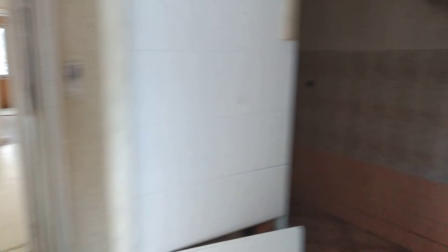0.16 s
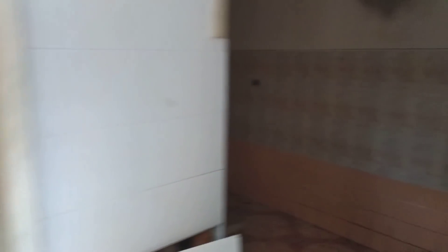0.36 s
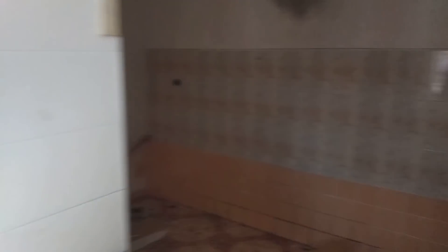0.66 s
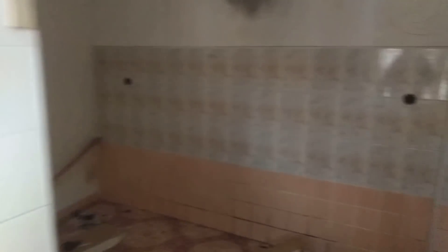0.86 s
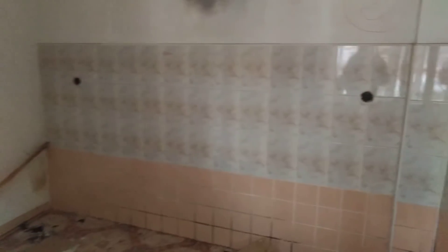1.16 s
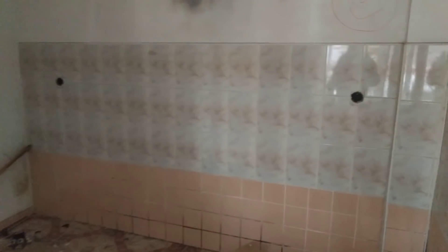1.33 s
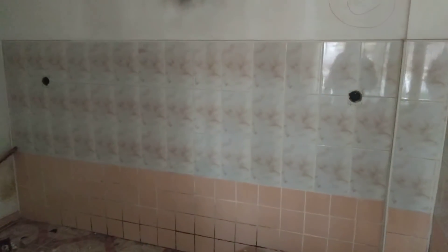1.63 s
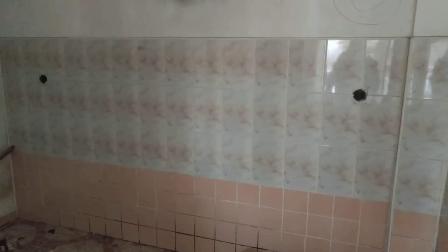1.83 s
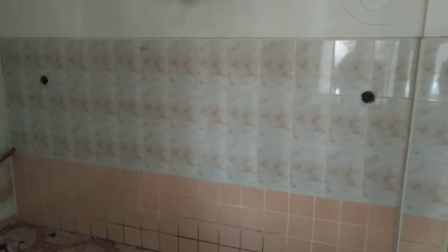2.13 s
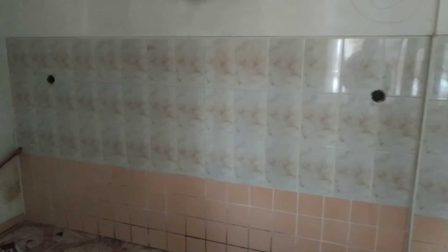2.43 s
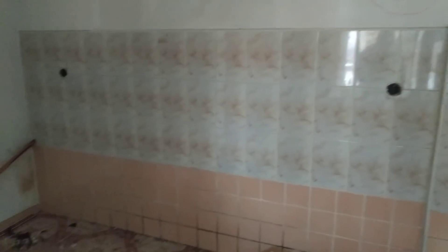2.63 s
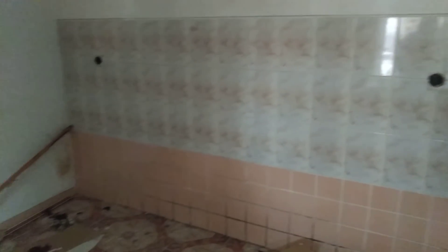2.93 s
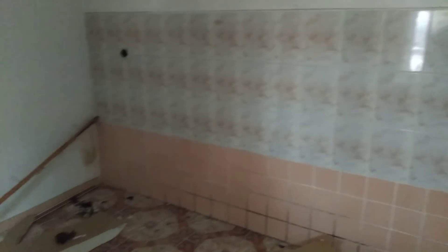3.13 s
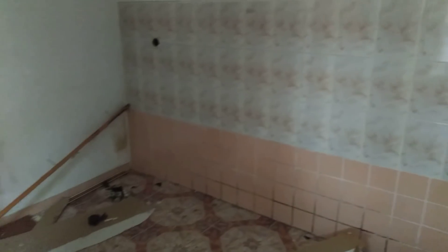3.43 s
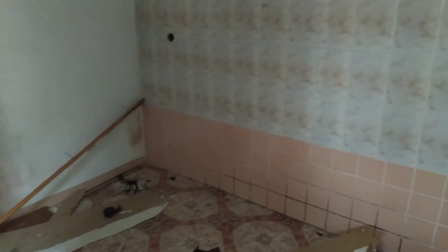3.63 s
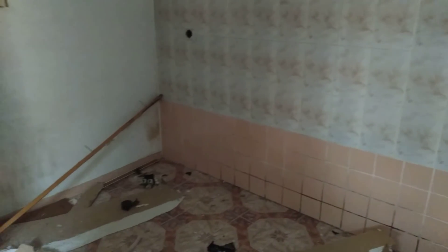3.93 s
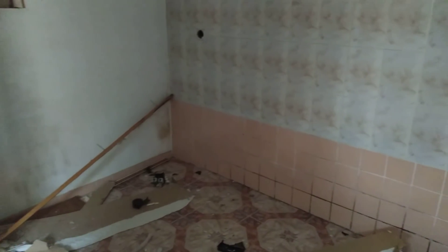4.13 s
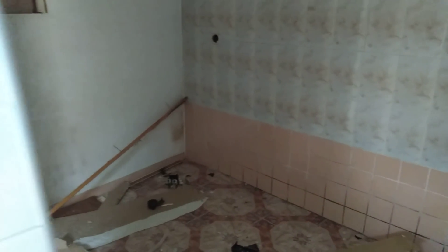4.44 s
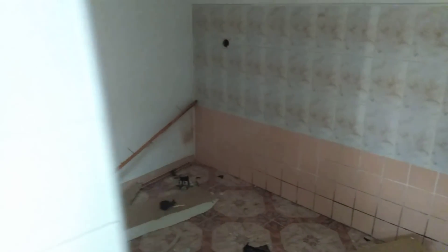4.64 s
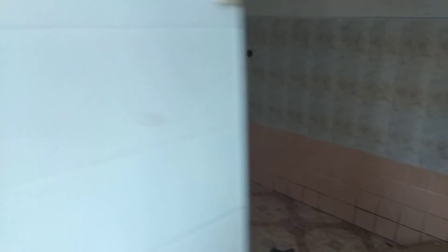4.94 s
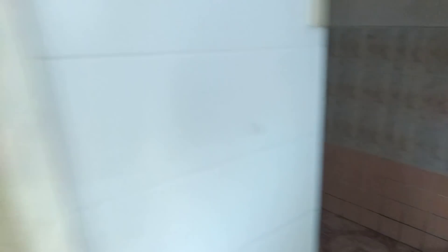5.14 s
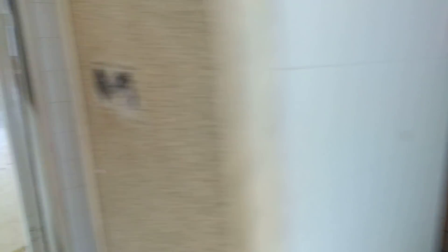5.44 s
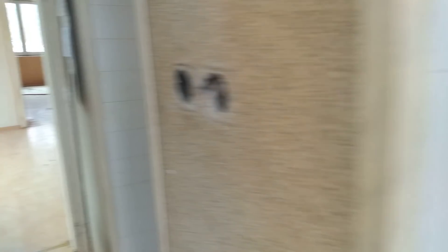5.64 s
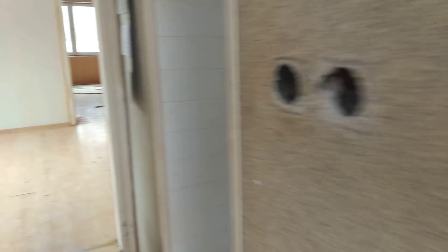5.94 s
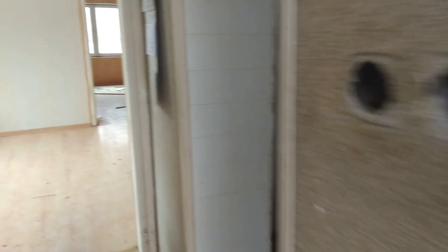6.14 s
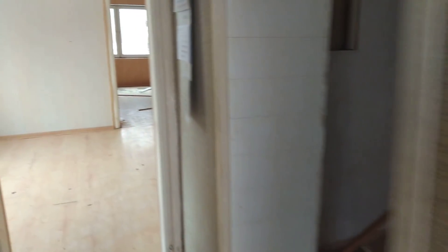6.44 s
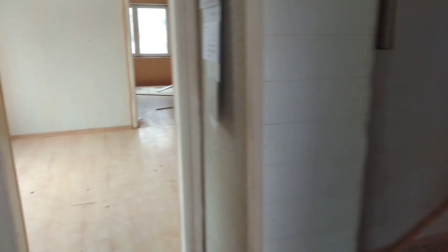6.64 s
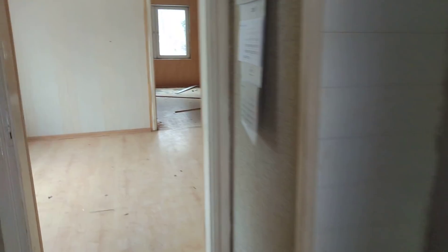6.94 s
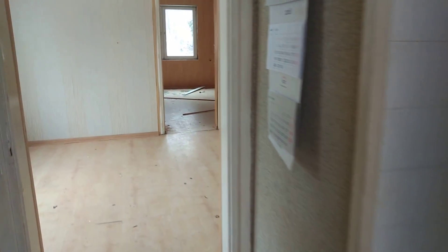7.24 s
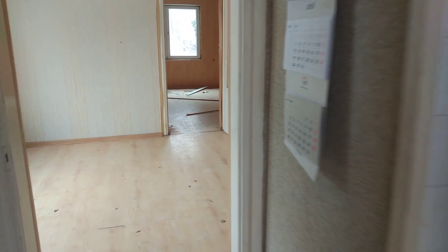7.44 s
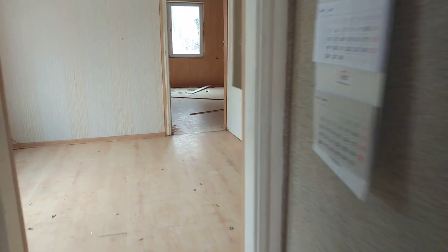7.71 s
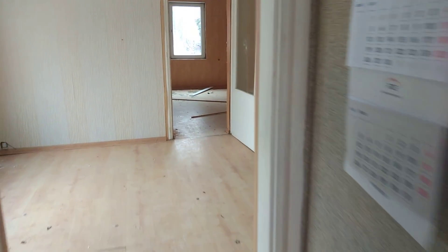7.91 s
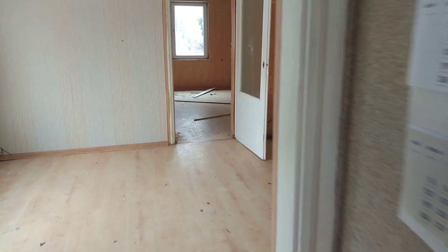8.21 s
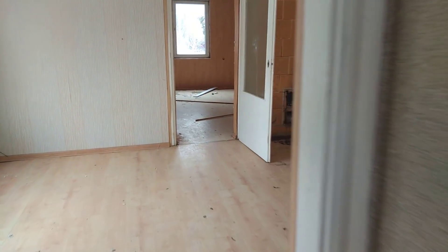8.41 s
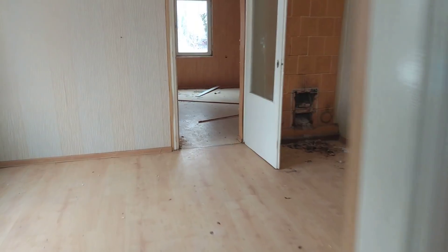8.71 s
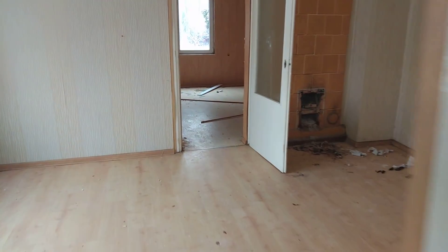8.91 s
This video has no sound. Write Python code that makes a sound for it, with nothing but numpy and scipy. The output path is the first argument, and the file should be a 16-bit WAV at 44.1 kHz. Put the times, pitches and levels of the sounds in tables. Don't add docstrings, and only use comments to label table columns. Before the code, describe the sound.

Footsteps on debris in a bare tiled room, heard near the microphone: faint crackles, then a heavy grinding crunch, a lull, and another brighter scuff with ringing shards. The walker moves onto laminate, with soft low thumps, small clicks and gritty scuffs. A faint boomy air tone continues, with thin bass and slightly patchy, gated recorder sound.

```python
import sys
import numpy as np
from scipy import signal
from scipy.io import wavfile
from scipy.ndimage import uniform_filter1d

SR = 44100
rng = np.random.default_rng(int(sys.argv[2]) if len(sys.argv) > 2 else 0)


def level_to_linear(level):
    exponent = np.asarray(level, float) / 20
    return 10 ** exponent


def wav_record(signal):
    frames = np.transpose(np.atleast_2d(signal))
    bounded = np.clip(frames, -1, 1)
    quanta = np.round(bounded * 32767).astype(np.int16)
    wavfile.write(sys.argv[1], SR, quanta)


N = 399987
TIME = np.arange(N) / SR


def rms_one(x):
    return x / np.sqrt(np.mean(x ** 2) + 1e-20)


def band(x, low_hz, high_hz, order=2):
    edges = [low_hz, min(high_hz, 0.45 * SR)]
    return signal.sosfilt(signal.butter(order, edges, "band", fs=SR, output="sos"), x)


def ring(x, hz, t60):
    r = level_to_linear(-60 / (t60 * SR))
    w = 2 * np.pi * hz / SR
    return signal.lfilter([0, np.sin(w)], [1, -2 * r * np.cos(w), r * r], x + 1e-18)


def add(out, s, sound):
    i = round(s * SR)
    out[i:i + len(sound)] += sound[:N - i]


def drift(rate_hz):
    r = np.exp(-80 * np.pi * rate_hz / SR)
    settle = 2000
    slow = signal.lfilter([1], [1, -2 * r, r * r], rng.standard_normal(N // 40 + settle + 2))[settle:]
    return np.interp(np.arange(N) / 40, np.arange(len(slow)), rms_one(slow))


def grit(size, per_s, spread_db):
    size_db = spread_db * np.minimum(rng.exponential(1, size), 4)
    fractures = level_to_linear(size_db) * rng.choice([-1, 1], size)
    return rms_one(fractures * (rng.random(size) < per_s / SR))


FINE_DB = [-32.5, -27, -13, -2]
COARSE_DB = [-4.5, -7, -10, -6.5]
MIXED_DB = [-10.5, 0.5, 0.5, -0.4]


def colour_db(coarseness):
    fine, coarse, mixed = np.c_[FINE_DB], np.c_[COARSE_DB], np.c_[MIXED_DB]
    return fine + coarseness * (coarse - fine) + 4 * coarseness * (1 - coarseness) * mixed


# time_s [s], scrape_db [dB], coarseness [0-1]
SHUFFLE = [(0.0, -35, 0.89), (0.25, -41.5, 0.85), (0.8, -58, 0.7), (1.5, -45, 0.6), (1.75, -26, 0.72),
           (2.25, -43, 0.88), (2.5, -48, 0.87), (2.9, -44.5, 0.72), (3.8, -44.5, 0.65),
           (4.047, -51.5, 0.87), (4.55, -35.5, 0.04), (5.15, -47, 0.98), (5.95, -46.5, 0.82),
           (6.5, -44, 0.91), (6.85, -42.5, 0), (7.3, -42, 0.87), (8.2, -40, 0.76), (9.07, -43.5, 0.89)]
# hardest_s [s], scrape_db [dB], rise_s [s], fall_s [s], coarseness [0-1]
STROKES = [(0.0, -39, .05, 0.39, .6), (0.45, -32.5, 0.059, 0.64, 0), (0.58, -32, 0.17, 0.26, 0.88),
           (1.09, -16.5, 0.054, 0.35, 0.1), (1.158, -26, 0.17, 0.15, 0.94), (1.291, -11, 0.13, 0.22, 0.74),
           (1.34, -12, 0.082, 0.099, 0.73), (1.39, -14.5, 0.33, 0.017, 0.3), (1.45, -25.5, 0.087, 1, 0.64),
           (1.84, -27, 0.5, 0.092, 0.65), (1.891, -20, 0.033, 0.2, 0.6), (3.13, -31.5, 0.37, 0.12, 0.3),
           (3.42, -30.5, 0.12, 0.52, 0.28), (3.62, -38.5, 0.23, 0.24, 0.65),
           (4.14, -24.5, 0.031, 0.22, 0.78), (4.33, -18.5, 0.055, 0.21, 0.53),
           (4.7, -32, 0.087, 0.56, 0.77), (4.9, -46, 0.48, 0.68, 1), (5.3, -33.5, 0.28, 0.54, 0.26),
           (5.49, -29.5, 0.18, 0.24, 0.6), (6.23, -35.5, 0.048, 0.77, 0.44), (7.12, -39, 0.86, 0.7, 0.86),
           (7.68, -30.5, 0.24, 0.48, 0), (7.88, -40, 0.087, 0.56, 0.93), (8.681, -35, 0.19, 0.56, 0.82)]
STROKE_FALL_DB = 20


def scrape_db():
    step = TIME[::64]
    s, db, coarseness = np.transpose(SHUFFLE)
    shuffle_db = np.interp(step, s, db) + colour_db(np.interp(step, s, coarseness))
    power = level_to_linear(2 * shuffle_db)
    for s, db, rise, fall, coarseness in STROKES:
        away = np.where(step < s, (s - step) / max(rise, 0.01), (step - s) / max(fall, 0.01))
        power = power + level_to_linear(2 * (db - STROKE_FALL_DB * away + colour_db(coarseness)))
    return np.array([np.interp(TIME, step, 10 * np.log10(p)) for p in power])


DRAG_EDGES_HZ = [250, 900, 3000, 7000, 17000]


def drag():
    together = drift(5.1)
    noises = 0.82 * grit(N, per_s=1500.0, spread_db=8.5) + rng.standard_normal((2, N))
    edges = np.geomspace(250, 17000, 13)
    width = np.diff(DRAG_EDGES_HZ)
    per_hz_db = scrape_db() - 10 * np.log10(width)[:, None]
    centres = np.log(DRAG_EDGES_HZ[:-1] + 0.4 * width)
    out = 0
    for k, (low_hz, high_hz) in enumerate(zip(edges, edges[1:])):
        place = np.interp(np.log(low_hz * high_hz) / 2, centres, range(4))
        below = min(int(place), 2)
        db = per_hz_db[below] + (place - below) * (per_hz_db[below + 1] - per_hz_db[below])
        flicker_db = 0.74 * drift(14.0)
        out = out + level_to_linear(db + flicker_db) * band(noises[k % 2], low_hz, high_hz)
    return out * level_to_linear(0.41 * together + 10 * np.log10(SR / 2) - 1.0)


# start_s [s], peak_db [dB], brightest_hz [Hz], t60_s [s]
GRIT_CRACKS = [(0.068, -16.5, 11900, 0.41), (0.39, -28, 13300, 0.85), (2.173, -18, 11500, 0.44),
               (2.416, -29.5, 14050, 0.83), (2.561, -30, 13500, 0.95), (2.888, -24, 13000, 0.25),
               (3.009, -33, 7300, 0.7), (3.6062, -18.5, 10300, 0.5), (3.668, -21.5, 11500, 0.3),
               (3.784, -31, 13100, 1), (3.9712, -25, 12900, 1), (4.08, -26, 9000, 0.56),
               (4.274, -17, 12000, 0.5), (4.281, -17, 6500, 1), (4.5014, -19.5, 7040, 0.65),
               (4.317, -12, 11500, 0.63), (6.848, -28, 10800, 0.2)]
# start_s [s], peak_db [dB], plaster_db [dB re peak], brightest_hz [Hz], t60_s [s]
PLASTER_CRACKS = [(0.0467, -17, -19, 13200, 0.21), (1.112, -10.5, -15, 3400, 0.65),
                  (1.2236, -10, -22, 10400, 0.15), (2.755, -22.5, -14, 10800, 0.36),
                  (3.2676, -16, -11.5, 9700, 0.61), (3.2987, -17, -26, 4800, 0.43),
                  (3.5807, -21.5, -9, 11800, 0.87), (4.676, -24.5, -7, 6860, 1),
                  (5.2624, -29, -6, 3320, 0.37), (5.497, -17, -27, 3540, 0.48),
                  (6.103, -29, -11, 12700, 0.45), (6.419, -30, -14, 6640, 0.21),
                  (6.432, -24.5, -13, 11800, 0.49), (6.799, -28.5, -24, 5860, 0.25),
                  (7.3, -24.5, -16, 10800, 0.7), (8.8014, -24.5, -9.5, 12500, 0.9)]
# start_s [s], peak_db [dB], board_db [dB re peak], plaster_db [dB re peak], t60_s [s]
HEAVY_CRACKS = [(0.447, -32, 4.5, -29, 0.29), (0.5056, -26, 3.5, -4, 1), (0.5534, -20, 6, -17, 0.05),
                (0.5712, -28.5, 12, -27, 0.5), (0.6733, -37, 11, 10.5, 1), (0.982, -15, -13.5, -40, 0.97),
                (1.268, -4, -1, 0, 0.37), (1.3429, -1.5, -32, -4.5, 0.56), (1.68, -7, -0.5, -9.5, 0.85),
                (1.7904, -9, -6.5, -7, 0.58), (1.9008, -9, -8.5, -3.5, 0.89), (3.127, -30, 1.5, 6.5, 0.78),
                (4.124, -13, -8.5, -11, 0.21), (4.868, -25, -17, -27, 0.22), (5.104, -25.5, 1.5, 0.5, 0.76),
                (5.3333, -20.5, -5.5, -16, 0.97), (5.6006, -19.5, -2, -4, 0.37), (6.244, -28.5, 4, 1, 0.87),
                (6.9588, -25, -7.5, -8, 0.89), (7.027, -24.5, 3.5, -4, 0.13), (7.8994, -31.5, 3, -1, 0.52)]


def crack_list():
    rows = []
    for s, db, hz, t60 in GRIT_CRACKS:
        rows.append((s, db, -50, -45, hz, t60))
    for s, db, plaster_db, hz, t60 in PLASTER_CRACKS:
        rows.append((s, db, -23.5, plaster_db, hz, t60))
    for s, db, board_db, plaster_db, t60 in HEAVY_CRACKS:
        hz = np.clip(10400 - 96 * (plaster_db - 5.5), 3000, 13000)
        rows.append((s, db, board_db, plaster_db, hz, t60))
    return sorted(rows)


def cracks():
    out, t = np.zeros(N), np.arange(SR // 3) / SR
    for s, db, board_db, plaster_db, hz, t60 in crack_list():
        noise = 0.21 * grit(len(t), per_s=2800.0, spread_db=-6.5) + rng.standard_normal(len(t))
        piece = ring(noise, hz, 14.0 / hz)
        bright = rms_one(band(noise, 0.22 * hz, 13600)) + 0.55 * rms_one(piece)
        plaster = level_to_linear(plaster_db + 0.5) * rms_one(band(noise[::-1], 820, 3300))
        board = level_to_linear(board_db - 4.0) * rms_one(band(noise, 250, 1540))
        onset = 1 - np.exp(-t / 0.0018)
        direct = 1 + 0.8 * np.exp(-t / 0.004)
        decay = level_to_linear(-60 * t / max(t60, 0.02)) * (1 - (t / t[-1]) ** 4)
        add(out, s, level_to_linear(db - 14.0) * onset * direct * decay * (rms_one(bright) + plaster + board))
    return out


# start_s [s], peak_db [dB], pitch_hz [Hz]
SNAPS = [(0.0457, -18, 1400), (0.07, -12, 7500), (0.0753, -16, 12900), (0.0918, -19, 7800),
         (0.1136, -19, 8100), (0.1236, -18, 8200), (0.3929, -28, 12600), (0.4038, -26, 9800),
         (0.4381, -28, 11700), (0.5058, -12, 11000), (0.5236, -17, 10600), (0.543, -18, 8700),
         (0.5464, -18, 10900), (0.5513, -16, 10400), (0.5548, -12, 10600), (0.5724, -18, 11500),
         (0.6346, -25, 11200), (0.6747, -22, 1600), (0.709, -23, 12200), (0.7637, -28, 12900),
         (0.9812, -20, 7600), (1.226, -7, 10400), (1.3419, -3, 2300), (1.454, -9, 13100),
         (1.6826, -13, 11600), (1.7751, -12, 12700), (1.782, -17, 4000), (1.7934, -11, 7900),
         (2.1754, -20, 10900), (2.1793, -19, 7300), (2.4196, -28, 13500), (2.5633, -32, 11600),
         (2.7605, -26, 9600), (2.8909, -24, 13200),
         (3.0097, -24, 9600), (3.0123, -21, 9900), (3.1347, -23, 11400), (3.2708, -17, 11600),
              (3.2733, -16, 12000), (3.3994, -23, 11900), (3.5822, -18, 11700), (3.5848, -21, 11600),
              (3.6067, -17, 9800), (3.7871, -28, 10900), (3.9726, -25, 12300), (3.9754, -26, 11100),
              (4.0811, -27, 7700), (4.1256, -17, 2200), (4.2732, -18, 13100), (4.289, -14, 6300),
              (4.32, -11, 11200), (4.3253, -9, 11800), (4.5038, -22, 6100), (4.5061, -17, 6900),
              (4.8675, -28, 13100), (4.878, -23, 11600), (4.9734, -29, 12500), (5.1066, -21, 1200),
              (5.2285, -30, 13400), (5.267, -23, 1300), (5.315, -26, 12500), (5.3334, -20, 1200),
              (5.4992, -19, 10700), (5.871, -11, 11500), (6.2097, -29, 11500), (6.2438, -24, 13200),
              (6.2475, -20, 13400), (6.2516, -21, 12100), (6.4194, -29, 6600), (6.432, -22, 13500),
              (6.8029, -30, 6000), (6.8089, -28, 5800), (6.8526, -27, 10600), (7.0293, -25, 10600),
              (7.3049, -21, 11100), (7.3248, -23, 10200), (7.3675, -26, 13300), (7.45, -27, 11000),
              (7.462, -28, 10100), (7.4763, -28, 10300), (7.4872, -25, 10800), (7.5447, -22, 9600),
              (7.549, -25, 12600), (7.557, -26, 13100), (7.5715, -29, 12500), (7.6374, -26, 9800),
              (7.8968, -22, 3700), (8.1938, -27, 11900), (8.8038, -23, 13400), (8.8871, -20, 11700),
              (8.8911, -19, 11000), (8.8945, -14, 13300)]


def snaps():
    out, t = np.zeros(N), np.arange(120) / SR
    for s, db, hz in SNAPS:
        noise = band(rng.standard_normal(len(t)), hz / 1.3, min(hz * 1.3, 14000))
        burst = noise * np.exp(-t / (0.0003 + 1.5 / hz))
        trim_db = np.interp(hz, [1500, 9000], [-3.5, 0.5])
        add(out, s, level_to_linear(db + trim_db) * burst / np.max(np.abs(burst)))
    return out


# start_s [s], peak_db [dB], pitch_hz [Hz], t60_s [s]
KNOCKS = [(1.2690, -10.5, 1110, 0.017), (1.341, -8, 1220, 0.017), (1.3500, -13, 1910, .015),
          (1.3608, -17, 1300, .015), (1.395, -16, 1520, .015), (1.6800, -12.5, 970, .008),
          (1.7910, -18.5, 950, 0.022), (1.9010, -25, 1280, 0.018), (1.9260, -18, 1200, 0.022),
          (4.1250, -26, 1880, .02), (4.143, -24, 2070, .02)]


def knocks():
    out, click = np.zeros(N), np.eye(1, SR // 10)[0]
    for s, db, hz, t60 in KNOCKS:
        t60 = max(t60, 0.003)
        add(out, s, level_to_linear(db) * (ring(click, hz, t60) + 0.5 * ring(click, 2.13 * hz, 0.71 * t60)))
    return out


def steadied(x, share):
    return x / (uniform_filter1d(x ** 2, SR // 80) + 0.05) ** (share / 2)


# start_s [s], level_db [dB], rise_s [s], t60_s [s], piece [name]
KICKS = [(0.045, -36, 0.00086, 0.73, "lump"), (0.068, -27.5, 0.0014, 0.46, "flake"),
         (0.981, -30, 0.001, 0.37, "corner"), (0.994, -29, 0.00086, 0.83, "shim"),
         (0.986, -20, 0.08, 1, "heap"), (1.074, -24, 0.016, 0.77, "sliver"),
         (1.10, -22, 0.08, 0.4, "strip"), (1.223, -20, 0.012, 0.31, "splinter"),
         (1.34, -27, 0.00054, 0.61, "slab"), (1.68, -40, 0.0014, 0.27, "plank"),
         (1.68, -25, 0.00061, 0.22, "board"), (2.371, -60.5, 0.055, 0.63, "panel"),
         (2.761, -44.5, 0.0022, 0.49, "pebble"), (2.886, -50, 0.0017, 1, "pebble"),
         (3.006, -18, 0.001, 0.82, "crust"), (4.078, -37, 0.0018, 0.27, "crumb"),
         (4.094, -41, 0.0018, 0.41, "clod"), (4.126, -22, 0.0011, 0.89, "brick"),
         (5.265, -41.5, 0.32, 1, "rubble"), (5.601, -30, 0.0019, 0.55, "tile"),
         (5.870, -12, 0.0008, 0.028, "tick"), (5.871, -27, 0.0032, 0.39, "glass"),
         (7.62, -38.5, 0.13, 0.78, "sand"), (8.422, -12.5, 0.036, 0.12, "burst"),
         (8.429, -19.5, 0.0099, 0.59, "spray"), (8.886, -33, 0.004, 0.071, "speck"),
         (8.893, -49, 0.001, 0.42, "speck")]
# start_s [s], level_db [dB], rise_s [s], t60_s [s],
# piece [name]
SLIDES = [(1.791, -29, .002, 0.68, "tread"), (1.901, -32, .02, 0.78, "tread"),
          (4.502, -34.5, .003, 0.32, "husk"), (6.232, -34, 0.013, 0.45, "dust"),
          (4.28, -36, .004, 0.44, "husk"), (8, -38, .01, 0.42, "dust"), (4.35, -36, 0.027, 0.76, "tread"),
          (1.245, -29, .002, .3, "tread"), (0.45, -34, .04, 0.65, "dust"), (4.3, -30, .03, 0.62, "grain"),
          (7.291, -44, .004, .4, "gravel"), (7.335, -38, 0.009, 0.45, "gravel"),
          (7.41, -38, .02, 0.9, "gravel"), (6.9, -45, .01, 0.52, "gravel"), (7.6, -37, .03, 1, "gravel"),
          (5.5, -38, .003, .3, "gravel")]
# mode_hz [Hz], level_db [dB], width_hz [Hz]
HARD_PIECES = dict(flake=[(7700, -3.5, 620), (8450, -6, 650), (11500, -5.5, 230), (13000, -2, 400)],
               corner=[(7820, 5.5, 180), (12000, 0, 120)], shim=[(9430, 3, 62), (12800, 0, 64)],
               sliver=[(10140, 2.5, 93), (10440, -2, 53), (10800, -4, 50), (12400, 2, 100), (13300, -9, 80),
               (13800, 1, 100)], strip=[(6385, 8, 45)], splinter=[(10400, 5.5, 490), (7800, -11, 304)],
               slab=[(1247, 4, 106), (952, -10, 63), (1072, -5, 33), (1760, 1, 53), (1980, 3.5, 69),
               (2166, 4.5, 55), (2316, 5, 150), (3160, -2.5, 220), (1600, 4.5, 1500)],
               plank=[(11800, 3, 170), (13600, 0, 150)], board=[(373, 4, 200), (203, -2, 44),
               (880, -2, 110), (600, -6, 98)], panel=[(453, 14.5, 28)], tile=[(4020, 1.5, 80),
               (4230, -5, 250), (5015, -2, 90), (10400, -5, 50), (10900, -7.5, 72)],
               glass=[(8960, -2.5, 71), (11900, 1.5, 280), (11500, -10, 1600)])
# mode_hz [Hz], level_db [dB], width_hz [Hz]
SOFT_PIECES = dict(lump=[(1490, -3, 680)], heap=[(8400, 4, 11400)], pebble=[(3000, -0.5, 720),
               (6360, -3, 1500)], crust=[(7360, -17.5, 2200), (5240, -22, 1100)], crumb=[(7800, -1, 1000)],
               clod=[(1140, -2, 1100)], brick=[(1915, -9, 440), (1840, -10.5, 940)],
               rubble=[(3420, 19, 1040), (1260, 1, 220)], tick=[(11900, -11, 1500), (6100, -24, 2100),
               (9100, -7, 100)], sand=[(1150, 5.5, 1130), (3550, 8, 3500)], burst=[(11900, 14, 5400),
               (7650, 1.5, 8400), (3320, -2.5, 2500), (1220, -14, 420)], spray=[(10900, -3.5, 4600),
               (4970, -9, 4900)], speck=[(11500, 13.5, 4500)], tread=[(1200, -0.5, 460), (4570, -8, 980)],
               husk=[(6100, -3, 1200), (10000, 2, 4300)], gravel=[(10000, -0.5, 1500), (13000, -4, 1500)],
               grain=[(3900, 3, 1800)], dust=[(13000, 3.5, 2000), (11100, -5, 2600)])


def shards(events):
    out, t = np.zeros(N), np.arange(SR // 2) / SR
    settle = 2000
    for s, db, rise, t60, piece in events:
        modes = {**HARD_PIECES, **SOFT_PIECES}[piece]
        share = 0.35 if piece in HARD_PIECES else 0
        tone = np.zeros(len(t))
        for hz, mode_db, width in modes:
            skid = rng.standard_normal(len(t) + settle)
            mode = rms_one(band(skid, hz - width / 2, hz + width / 2)[settle:])
            tone += level_to_linear(mode_db) * steadied(mode, share)
        add(out, s, level_to_linear(db - 60 * t / t60) * (1 - np.exp(-t / max(rise, 1e-4))) * tone)
    return out


def chips():
    hits = grit(N, per_s=88.0, spread_db=5.5)
    dealt = rng.integers(0, 12, N)
    pitches = np.geomspace(5500, 13500, 12) * rng.uniform(0.96, 1.04, 12)
    rings = sum(ring(hits * (dealt == k), hz, 0.025) for k, hz in enumerate(pitches))
    drag_db = scrape_db()[3]
    level_db = drag_db - 9 + 0.6 * np.minimum(drag_db + 25, 0)
    return level_to_linear(level_db) * rms_one(0.5 * rings + room(rings))


# start_s [s], peak_db [dB], pitch_hz [Hz]
HEELS = [(0.574, -40, 135), (1.264, -30, 270), (1.68, -25, 276), (4.875, -42, 120), (5.098, -37.5, 362),
         (6.207, -33, 174), (6.236, -34.5, 127), (6.512, -38.5, 68), (6.959, -34, 163), (6.98, -37, 97),
         (7.019, -47, 202), (7.132, -45, 80), (7.298, -41, 92), (7.827, -41.5, 185), (7.835, -37, 88),
         (7.907, -46, 90), (7.964, -38, 68), (8.01, -43, 75), (8.112, -36, 68), (8.625, -30.5, 174),
         (8.72, -41, 75)]
HEEL_T60_S = 0.12


def heels():
    out, t, t60 = np.zeros(N), np.arange(SR // 2) / SR, HEEL_T60_S
    push_s = 0.0009
    push = np.exp(-t / push_s) / (push_s * SR)
    for s, db, hz in HEELS:
        puff = rms_one(band(rng.standard_normal(len(t)), 0.55 * hz, 1.96 * hz)) * level_to_linear(-60 * t / (1.84 * t60))
        thump = ring(push, hz, 0.46 * t60)
        thump += 0.35 * ring(push, 2.0 * hz, 0.097 * t60)
        thump += 0.58 * ring(push, max(0.56 * hz, 64), 1.0 * t60)
        add(out, s, level_to_linear(db + 2.5) * (thump + 0.2 * puff))
    return out


ROOM_T60_S, ROOM_DB = 0.44, 2.5


def room(x):
    t = np.arange(SR // 2) / SR
    tail = rng.standard_normal(len(t)) * level_to_linear(-60 * t / ROOM_T60_S) * (t > 0.004)
    return signal.fftconvolve(x, tail / np.sqrt(np.sum(tail ** 2)))[:N]


# mode_hz [Hz], level_db [dB], t60_s [s]
STANDING = [
    (362.3, -75, 0.32),
    (272, -75.5, 0.27),
    (224, -72, 0.12),
]


def standing_waves(x):
    return sum(level_to_linear(db + 18) * ring(x, hz, t60) for hz, db, t60 in STANDING)


# time_s [s], level_db [dB]
BOOM = [(0.0, -32.5), (0.1, -34.5), (0.3, -40), (0.45, -48.5), (0.73, -34.5), (0.91, -39), (1.15, -53.5),
        (1.51, -47), (1.95, -56.5), (3.21, -49), (4.27, -54.5), (4.6, -51), (5.56, -46), (6.0, -47),
        (6.15, -54), (7.63, -58), (8.3, -44.5), (8.97, -41)]
BOOM_HZ, BOOM_WIDTH_HZ = 59, 6
BOOM_PER_HEEL_DB, BOOM_AFTER_HEEL_S = -24, 0.044
INSIDE_S, DOORWAY_S = 2.54, 5


def boom():
    s, db = np.transpose(BOOM)
    boom_db = np.interp(TIME, s, db)
    stirred = 0
    for s, db, hz in HEELS:
        if s > DOORWAY_S:
            dying = np.exp(-np.abs(TIME - s) / BOOM_AFTER_HEEL_S) * (TIME > s)
            stirred = stirred + level_to_linear(db + BOOM_PER_HEEL_DB) * dying
    t60 = np.log(1000) / (np.pi * BOOM_WIDTH_HZ)
    air = rng.standard_normal(N + SR)
    mode = rms_one(ring(ring(air, BOOM_HZ, t60), BOOM_HZ, t60)[SR:])
    lumpy = rms_one(ring(ring(air[::-1], BOOM_HZ, t60 / 3), BOOM_HZ, t60 / 3)[SR:])
    faint = np.interp(boom_db, [-48, -42], [0.9, 0])
    mode = np.sqrt(1 - faint) * mode + np.sqrt(faint) * lumpy
    swing = np.sqrt(uniform_filter1d(mode ** 2, SR // 30) + 0.027)
    evenness = np.interp(boom_db, [-50, -41], [0, 0.85])
    return (level_to_linear(boom_db) + stirred) * rms_one(mode / swing ** evenness)


RUMBLE_DB, RUMBLE_FOLLOWS_DRAG, OPEN_ROOM_DB = -65, 0.061, 5


def rumble():
    outside = np.clip(np.maximum(2 * (INSIDE_S - TIME), TIME - DOORWAY_S), 0, 1)
    db = RUMBLE_DB + OPEN_ROOM_DB * outside + RUMBLE_FOLLOWS_DRAG * (scrape_db()[0] + 46.0)
    air = rng.standard_normal(N + SR)
    low = rms_one(band(air, 25, 262)[SR:]) + 0.5 * rms_one(band(air, 50.5, 52.0)[SR:])
    return level_to_linear(db + 5.5) * low


def hum():
    hz = 357
    air = rng.standard_normal(N + SR)
    return level_to_linear(-67) * rms_one(band(air, 0.95 * hz, 1.056 * hz)[SR:])


def scene():
    scraped = drag() + cracks()
    snapped = snaps() + knocks()
    stepped = heels()
    echoes = room(level_to_linear(ROOM_DB) * stepped + level_to_linear(-4.5) * snapped)
    debris = shards(KICKS) + shards(SLIDES) + chips()
    background = standing_waves(scraped) + boom() + rumble() + hum()
    return (scraped + snapped + debris + stepped + echoes + background)[None]


# reopen_s [s], closing_s [s], depth_db [dB]
GATE = [(0.391, 0.046, -3.5), (2.415, 0.14, -5.5), (2.751, 0.062, -23.5), (2.885, 0.026, -7.5),
        (3.005, 0.06, -10.5), (3.968, 0.076, -5), (5.104, 0.086, -6), (5.843, 0.042, -25),
        (3.266, 0.039, 1), (4.5, 0.044, 0), (5.866, 0.033, -23), (6.101, 0.055, -13), (6.149, 0.027, -15),
        (6.205, 0.14, -14.5), (6.956, 0.078, -13)]


def gate():
    db = np.zeros(N)
    for s, closing, depth_db in GATE:
        corners = [s - closing, s - 0.17 * closing, s - 0.002, s]
        db += depth_db * np.interp(TIME, corners, [0.0064, 0.71, 0.49, 0.0013])
    return level_to_linear(db)


def dropouts(x):
    hz, _, z = signal.stft(x, SR, nperseg=1024)
    chance = rng.standard_normal(z.shape[1:])
    chance = uniform_filter1d(chance, size=5, axis=0)
    chance = rms_one(uniform_filter1d(chance, size=7, axis=1))
    threshold = np.interp(hz, [1500, 3500, 5200, 7000], [2.3, 1.05, 1.05, 2.8])[:, None]
    gain = np.where(chance > threshold, level_to_linear(-26), 1)
    return signal.istft(z * gain, SR, nperseg=1024)[1][:, :N]


def low_pass(x):
    return signal.sosfilt(signal.butter(12, 15130, fs=SR, output="sos"), x)


def record(dry):
    x = 0.97 * np.tanh(dry * gate() / 0.93)
    x = signal.sosfilt(signal.butter(4, 42, "high", fs=SR, output="sos"), x)
    x = signal.sosfilt(signal.ellip(12, 0.5, 52, 14020, fs=SR, output="sos"), x)
    return low_pass(dropouts(x))


dry = scene()
out = record(dry)
wav_record(out)
```